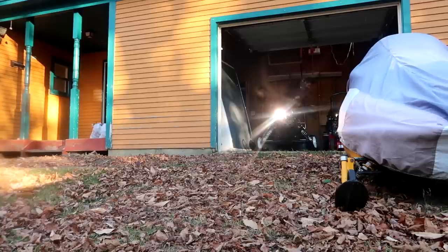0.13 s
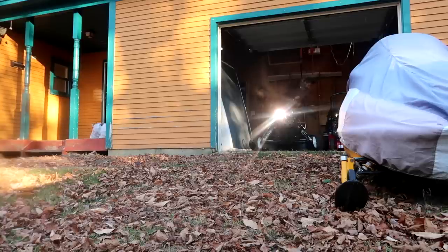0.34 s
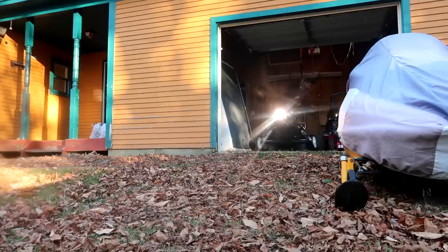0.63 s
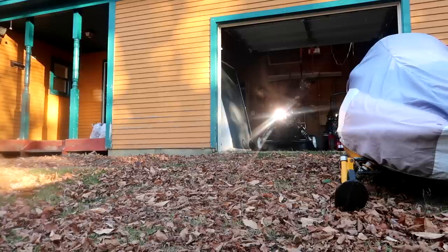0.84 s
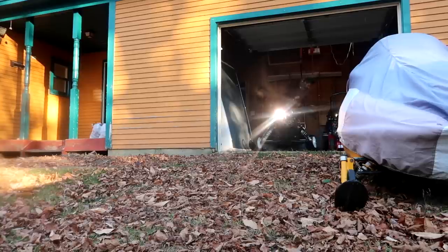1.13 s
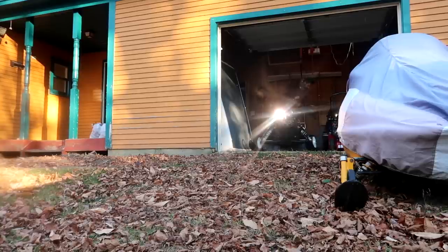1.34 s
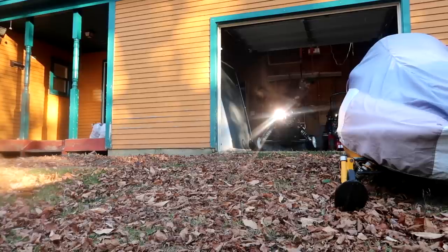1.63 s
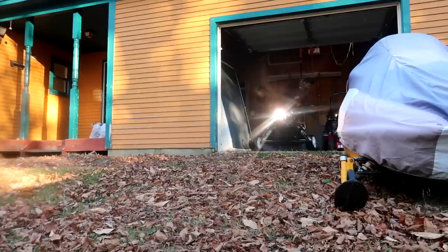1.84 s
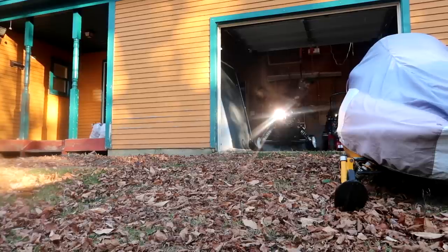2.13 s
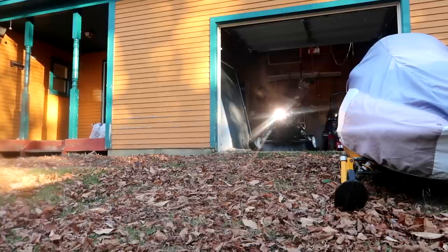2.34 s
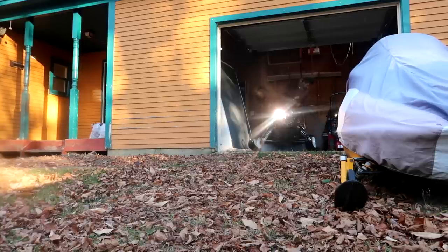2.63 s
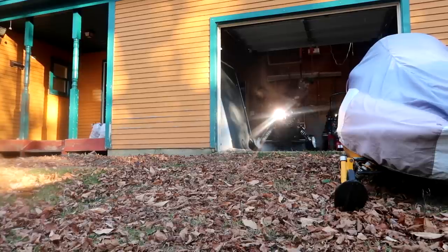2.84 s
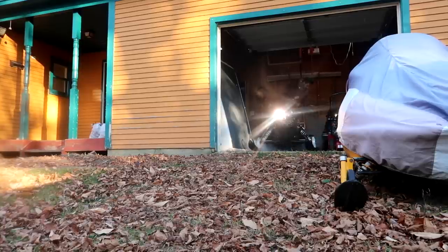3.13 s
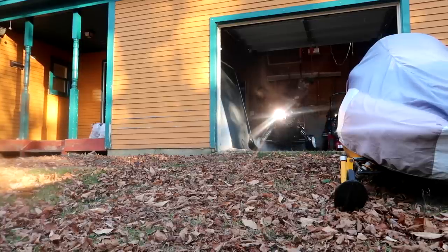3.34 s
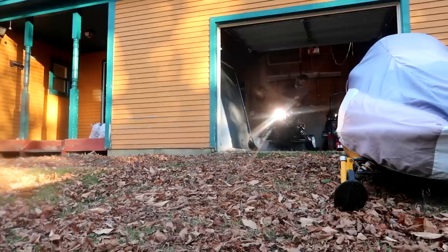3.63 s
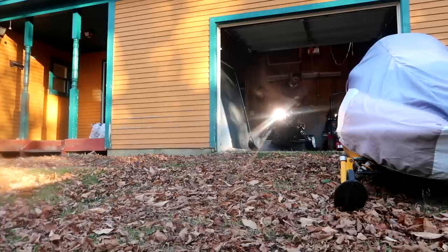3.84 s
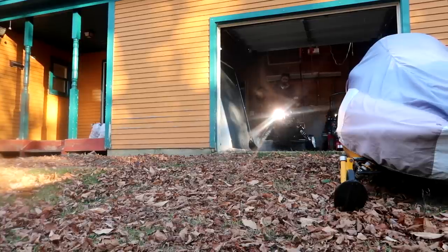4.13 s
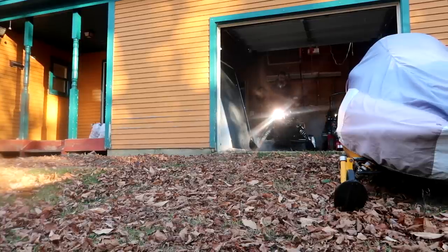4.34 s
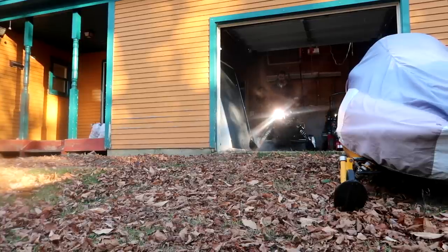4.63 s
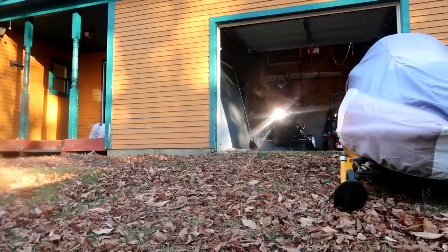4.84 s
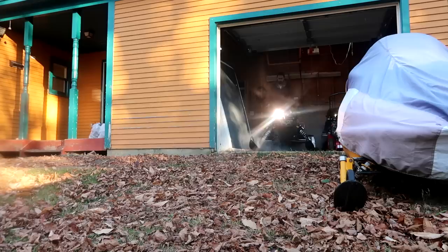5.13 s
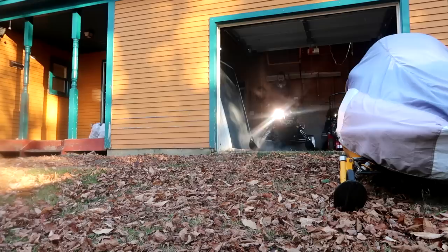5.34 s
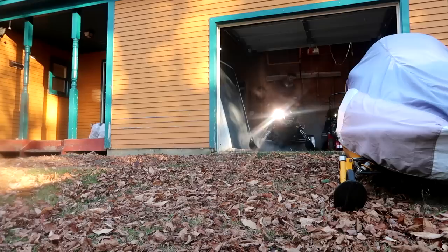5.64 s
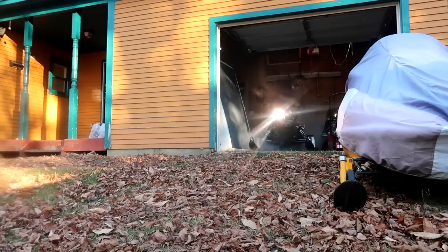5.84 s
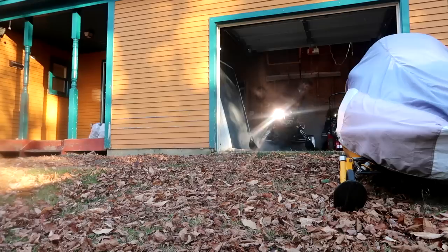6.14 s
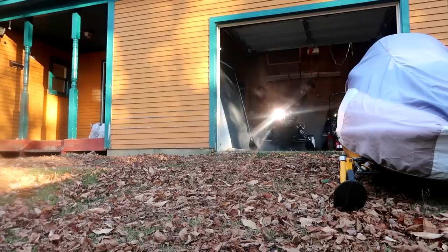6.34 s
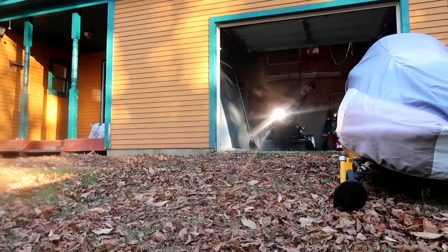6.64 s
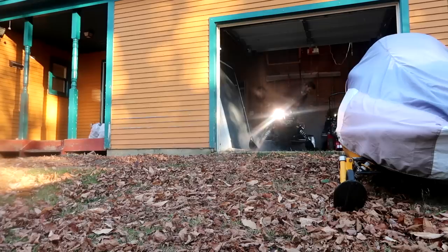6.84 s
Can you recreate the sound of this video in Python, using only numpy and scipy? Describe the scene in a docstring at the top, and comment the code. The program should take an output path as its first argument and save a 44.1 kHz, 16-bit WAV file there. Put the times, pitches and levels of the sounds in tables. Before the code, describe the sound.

A two-stroke snowmobile engine in an open garage, heard from the yard through a compact stereo microphone. From 0 to 2.3 s the throttle is blipped about six times, roughly every 0.3 to 0.5 s; each blip swells into a crackling, nasal howl, fastest near 0.9, 1.75 and 2.3 s, with hard, uneven pops ringing the pipe and garage. A bright knock lands at 0.9 s. The engine sags to a low idle around 2.7 s, gets two blips from 2.85 to 3.4 s, and sags again from 3.7 to 4.1 s. Four more quick blips follow from 4.15 to 5.2 s, the last peaking near 5.25 s. It then drops, and from 5.6 s to the end at 7 s it idles lumpily: misfiring pops, often paired, a hollow low boom swelling and fading, gated rattling hiss, metallic ticks and faint knocks.

```python
"""A string of throttle blips, then a lumpy idle: a two-stroke snowmobile in an open garage, heard from the yard.
Each firing is a sharp pop that rings the pipe and the garage; not every stroke fires.
Every stroke, fired or not, pumps a drone of harmonics; open throttle adds a howl of crisp pulses.
A boom swells at idle; noise gated by the strokes makes a rattling hiss, with ticks and a few engine knocks."""
import sys
import numpy as np
from scipy import signal
from scipy.fft import rfft, irfft
from scipy.io import wavfile
from scipy.ndimage import uniform_filter1d

SR = 44100
rng = np.random.default_rng(int(sys.argv[2]) if len(sys.argv) > 2 else 0)


def master(y):
    """Save y as 16-bit WAV."""
    cut = np.clip(np.atleast_2d(y).T, -1, 1)
    pcm = np.round(cut * 32767)  # scale
    wavfile.write(sys.argv[1], SR, pcm.astype(np.int16))


N = 307816
TIME, HZ = np.arange(N) / SR, np.fft.rfftfreq(N, 1 / SR)

# throttle blips: opens_s, closes_s, burn_db, intake_db (also drives the rasp); levels are relative
THROTTLE_BLIPS = [(-.1,0.226,-20,-37.5),(0.307,0.463,-17.5,-39.5),(0.632,0.844,-16.5,-39.5),(1.077,1.261,-14,-39),
                  (1.45,1.731,-14.5,-38),(1.95,2.275,-15.5,-38),(2.852,3.027,-15,-32),(3.185,3.391,-16,-35.5),
                  (4.152,4.263,-21,-33),(4.42,4.575,-15,-42),(4.689,4.865,-14,-40),(5.004,5.156,-14.5,-40.5)]
# the hardest firings: time_s, level_db (relative)
HARD_POPS = [(0.025,-0.5),(0.072,3.5),(0.115,-4),(0.1857,-0.5),(0.3021,2.5),(.334,-4),(0.3881,-0.5),(0.427,3),(0.4645,-3.5),(0.4829,-4),(0.577,-2.5),
             (0.659,-3),(0.69,2),(0.7213,1),(0.7616,5),(0.7909,-4.5),(0.8008,4),(0.8255,-8.5),(0.8346,1.5),(0.9181,1.5),(1.1095,-2.5),(1.174,-6),
             (1.2326,2),(1.2501,-1.5),(1.2852,-2),(1.3833,-1.5),(1.43,-2),(1.5149,-1.5),(1.594,1.5),(1.6125,-6.5),(1.631,2),(1.6642,-0.5),
             (1.7134,-3.5),(1.759,-1),(1.8254,-1.5),(1.9103,-2.5),(1.9856,-1),(2.0272,-0.5),(2.1064,2),(2.1254,1),(2.1592,3),(2.1829,-16.5),
             (2.2081,1.5),(2.2975,0),(2.3578,-1),(2.5242,-1),(2.627,-2.5),(2.69,-4.5),(2.808,-2),(2.82,1),(2.9229,-0.5),(2.96,-5),
             (2.97,-5),(3.0109,3),(3.0391,-2.5),(3.049,-1.5),(3.181,2.5),(3.2816,-1.5),(3.2918,3.5),(3.3225,0.5),(3.3722,3.5),(3.3999,-3),(3.411,-4),
             (3.5171,1),(3.5482,2),(3.6508,1),(3.6867,2),(3.832,0.5),(3.844,-2),(3.979,-2),(3.9918,-0.5),(4.141,-1),(4.1542,-7),
             (4.217,0),(4.272,0.5),(4.302,-1),(4.3116,1),(4.3579,1),(4.387,-6),(4.4544,3.5),(4.502,-2.5),(4.545,1.5),(4.563,-4.5),
             (4.5951,1.5),(4.6201,-12),(4.7141,-1.5),(4.7685,-2.5),(4.8044,-4.5),(4.821,-5),(4.837,-1.5),(4.8605,0.5),(4.869,-7),(4.878,-1.5),(4.9015,-8.5),(5.0307,-2.5),
             (5.0602,0),(5.1137,-2.5),(5.164,2),(5.2046,1),(5.358,-5),(5.432,-8),(5.518,-2.5),(5.58,-14.5),(5.675,-3.5),(5.688,-3.5),
             (5.835,-2),(5.849,-5),(5.975,-4.5),(6.016,-5),(6.111,-2),(6.179,-5.5),(6.248,-3.5),(6.384,-1),(6.398,-1.5),(6.546,-5),
             (6.59,-3),(6.739,-6.5),(6.753,-0.5),(6.901,-4.5),(6.942,-3.5)]


def crank():
    """The crank follows the blips; at idle it sags between hard firings and each kicks it back up."""
    # engine speed through blips, coasting and idle: time_s, strokes_per_s
    speed_curve = [(0.0, 107), (0.1, 97), (0.15, 100), (0.2, 91), (0.25, 97), (0.35, 91), (0.45, 108),
                   (0.5, 111), (0.55, 103), (0.6, 103), (0.65, 92), (0.75, 99), (0.85, 120), (0.9, 123),
                   (1.1, 90), (1.15, 93), (1.3, 120), (1.45, 93), (1.55, 99), (1.65, 120), (1.75, 130),
                   (1.85, 109), (2.0, 86), (2.05, 99), (2.15, 120), (2.3, 138), (2.35, 128), (2.45, 104),
                   (2.55, 90), (2.65, 85), (2.7, 76), (2.85, 75), (2.9, 78), (3.05, 112), (3.1, 102),
                   (3.25, 92), (3.35, 100), (3.4, 110), (3.55, 92), (3.65, 84), (3.7, 83), (3.78, 74),
                   (4.12, 74), (4.2, 79), (4.3, 105), (4.35, 109), (4.45, 101), (4.6, 126), (4.65, 122),
                   (4.7, 109), (4.75, 107), (4.85, 125), (4.9, 124), (5.05, 104), (5.2, 128), (5.25, 130),
                   (5.3, 116), (5.36, 101), (5.44, 86), (5.52, 81), (5.62, 74)]
    sag_rate = 68  # strokes per s lost each second at idle
    speed = np.interp(TIME, *np.transpose(speed_curve))
    pop_s = np.sort(np.transpose(HARD_POPS)[0])
    edges = np.r_[0, pop_s, TIME[-1]]
    gap = np.searchsorted(pop_s, TIME)
    middle_s = (edges[gap] + edges[gap + 1]) / 2
    idling = np.interp(speed, [76, 82], [1, 0])
    speed = uniform_filter1d(speed + sag_rate * (middle_s - TIME) * idling, size=900)
    strokes = np.cumsum(speed) / SR
    # a smoothed shift draws the whole strokes towards the hard firings
    slip = np.unwrap(np.interp(pop_s, TIME, strokes), period=1)
    return speed, strokes - uniform_filter1d(np.interp(TIME, pop_s, slip), size=3600)


def throttle(heights, delay_s, attack_s, release_s):
    """One envelope per blip: it rises once the lever opens, holds, and dies away after it closes."""
    out = np.zeros(N)
    for (opens_s, closes_s, *_), height in zip(THROTTLE_BLIPS, heights):
        rise = np.clip((TIME - opens_s - delay_s) / attack_s, 0, 1)
        release = np.exp(-np.maximum(TIME - closes_s - delay_s, 0) / release_s)
        out += height * rise * release
    return out


def stroke_times(strokes):
    """Moments in seconds at which the crank completes whole strokes."""
    return np.interp(np.arange(np.ceil(strokes[0]), strokes[-1] - 1), strokes, TIME)


def samples_at(time_s):
    """Sample positions of these moments."""
    return np.clip(np.round(time_s * SR).astype(int), 0, N - 1)


def firings(speed, strokes, load, burn_db=3, pop_db=0, crack_db=0.0, rasp_db=4, stray_db=-31,
            scatter_db=6, modes_db=-4.0, pop_ring_db=1, jitter_s=.00008, lag_s=0.0012):
    """Burning charges strike pipe and garage: most strokes on open throttle, mainly hard pops when shut."""
    # strokes that fail to fire: strokes_per_s, share
    misfires = [(95,.35),(115,.06)]
    # strength of the burn, then of its rasp: strokes_per_s, level_db
    burn_curve = [(75,-8.5),(92,-6),(108,-4),(130,-15.5)]
    rasp_curve = [(75,-33.5),(98,-21),(112,-24),(128,-13)]
    # how much of a firing is crack rather than thump: strokes_per_s, share
    crack_share = [(75,0.4),(95,0.43),(112,0.67)]
    # colour of thump, crack and rasp: pitch_hz, level_db
    thump_colour = [(30,-55.5),(75,-16),(130,9),(250,5),(450,17.5),(650,2),(1100,-15.5),(1700,-23),(2800,-34),(4500,-39.5),(9000,-70.5),(16000,-79)]
    crack_colour = [(60,-37.5),(200,-9.5),(450,13),(800,4),(1200,-3),(1800,-19),(3000,-32.5),(5000,-34.5),(9000,-55),(16000,-49.5)]
    rasp_colour = [(100,-30.5),(450,-14),(800,10.5),(1100,-5.5),(1500,-8),(2000,-15.5),(3200,-37),(5000,-50.5),(9000,-78.5),(16000,-82.5)]

    time_s = stroke_times(strokes)
    luck, bite, early = rng.standard_normal((len(time_s), 3)).T
    overrun = throttle(amp(np.transpose(THROTTLE_BLIPS)[3]), delay_s=0.035, attack_s=0.11, release_s=0.051)
    rate, fuel, heat = (np.interp(time_s, TIME, curve) for curve in (speed, load, overrun))
    uneven_db = scatter_db * np.interp(rate, [98, 122], [1, .6])  # fast running is cleaner
    burn = amp(burn_db) * fuel + amp(stray_db)
    burn = burn * amp(read(burn_curve, rate) + uneven_db * np.minimum(luck, 1))
    rasp = heat * amp(rasp_db + read(rasp_curve, rate) + uneven_db * np.minimum(bite, 1))
    fired = rng.random(len(time_s)) > read(misfires, rate)
    burn, rasp = burn * fired, rasp * fired

    # each hard pop takes the place of the nearest ordinary stroke
    time_s = time_s + jitter_s * early
    hard = np.zeros(len(time_s))
    for when_s, level_db in HARD_POPS:
        stroke = np.argmin(abs(time_s - when_s))
        time_s[stroke], burn[stroke], rasp[stroke] = when_s, 0, 0
        hard[stroke] = amp(level_db + pop_db)

    sharp = np.clip(read(crack_share, rate), 0, 1)
    at = samples_at(time_s + lag_s)  # the run down the pipe
    thumps, cracks, rasps, strikes = np.zeros((4, N))
    thumps[at] = (burn + hard) * (1 - sharp)
    cracks[at] = (burn + hard) * sharp * amp(crack_db)
    rasps[at] = rasp
    strikes[at] = burn + amp(pop_ring_db) * hard
    blows = garage(ring(thumps, pulse(thump_colour)) + ring(cracks, pulse(crack_colour)), wet_db=-5)
    ringing = amp(modes_db) * ring(strikes, resonances())
    return -(blows + ringing + garage(ring(rasps, pulse(rasp_colour)), wet_db=3.5))


def resonances():
    """Separate low modes of exhaust pipe and garage, each a decaying sine, in alternating polarity."""
    # ringing modes: pitch_hz, level_db, t60_s
    mode_table = [(87.3,-26.5,0.16),(137.66,-10,0.43),(229.8,-26.5,0.9),(279.2,-24.5,0.4),(365.2,-24.5,0.67),(424,-29,.25),(443.5,-14,0.12),(499.5,-23,0.4),(554,-42,0.022),(679.5,-33.5,0.89),(804,-39,0.025),(880,-37.5,0.35),(960,-32.5,0.41),(995,-25,0.33),(1161,-28,0.48)]
    t = np.arange(SR // 2) / SR
    out = np.zeros(len(t))
    for k, (hz, db, t60_s) in enumerate(mode_table):
        decay = np.exp(-np.log(1000) * t / t60_s)
        out += (-1) ** k * amp(db) * decay * np.sin(2 * np.pi * hz * t)
    return out


def howl(speed, strokes, load, level_db=10, scatter_db=1.4, wet_db=-7, lag_s=.0012):
    """On open throttle every stroke sends a crisp pulse down the pipe; at speed they merge into a note."""
    # colour of the exhaust pulse: pitch_hz, level_db
    howl_colour = [(40,-30),(110,-11),(175,-6),(235,9.5),(300,-4),(368,6),(430,0),(495,2),(580,-13),(760,-14),(1000,-7),(1400,-13),(2000,-28),(3200,-38),(6000,-62),(16000,-75)]
    time_s = stroke_times(strokes)
    steady = np.interp(speed, [86, 104, 118], [.3, .7, 1])  # fuller at speed
    scatter = amp(level_db + scatter_db * rng.standard_normal(len(time_s)))
    height = np.interp(time_s, TIME, steady * load) * scatter
    # the howl's pulse is softer under a hard pop
    height[[np.argmin(abs(time_s - when_s)) for when_s, _ in HARD_POPS]] *= .7
    beats = np.zeros(N)
    beats[samples_at(time_s + lag_s)] = height
    return -garage(ring(beats, pulse(howl_colour)), wet_db=wet_db)


def drone(speed, strokes, lumpy_db=2, waver_db=2.5):
    """Gas pumped on every stroke, fired or not, sounds harmonics; their level is lumpier above idle."""
    # strength of the drone: strokes_per_s, level_db
    hum_curve = [(70,-22),(80,-17.5),(88,-27.5),(100,-24.5),(112,-29),(130,-37.5)]
    # resonance of the pipe: pitch_hz, level_db
    pipe_colour = [(60,-18.5),(76,-7.5),(98,-14.5),(112,2.5),(128,-1.5),(146,-13.5),(165,-16.5),(190,-22),(222,5),(243,8.5),(265,1.5),(290,-6.5),(350,-21.5),(400,-2.5),(445,-5),(490,-4.5),(560,-25.5),(900,-37.5),(1500,-35.5)]
    unsteady = np.interp(speed, [76, 88], [.2, 1])
    level = amp(read(hum_curve, speed) + lumpy_db * unsteady * wander(16))
    return level * orders(speed, strokes, pipe_colour, waver_db)


def orders(speed, strokes, pipe, waver_db, count=12):
    """Multiples of the stroke rate, rms about 1: each swells as it crosses a resonance of the pipe."""
    tone, power = np.zeros((2, N))
    for k in range(1, count + 1):
        gain = amp(read(pipe, k * speed))
        phase = 2 * np.pi * (k * strokes + rng.random()) + .12 * wander(18)
        waver = amp(waver_db * (k > 2) * wander(6.9))  # the two lowest hold steady
        tone += gain * waver * np.cos(phase)
        power += gain ** 2 / 2
    return tone / np.sqrt(power)


def boom(speed, strokes, level_db=3, lag_s=0.003):
    """The pipe booms at twice the stroke rate: a tone with a drawn swell, faded out above idle."""
    # swells of the boom, in consecutive groups: time_s, level_db
    swell_groups = [
        [(2.66, -32), (2.684, -26), (2.716, -13.5), (2.752, -27), (2.81, -7.5), (2.85, -21), (2.882, -36),
         (2.906, -22), (2.946, -4), (3.0, -20)],
        [(3.6, -18), (3.718, -21), (3.74, -19), (3.842, -11), (3.882, -21.5), (3.974, -7.5), (4.024, -23.5),
         (4.136, -7.5), (4.21, -27.5), (4.25, -11)],
        [(5.52, -27), (5.552, -20.5), (5.608, -18), (5.68, -11), (5.738, -22.5), (5.802, -12), (6.056, -16),
         (6.082, -11), (6.232, -15), (6.3, -8.5)],
        [(6.3, -8.5), (6.386, -11.5), (6.43, -27.5), (6.526, -8), (6.576, -16), (6.75, -8.5), (6.79, -31.5),
         (6.874, -10.5), (6.958, -17), (6.98, -24)],
    ]
    idling = np.interp(speed, [79, 90], [1, 0])
    swell_db = np.interp(TIME, *np.vstack(swell_groups).T)
    return idling * amp(level_db + swell_db) * np.cos(4 * np.pi * (strokes - lag_s * speed))


def rattle(strokes, idle_db=-41.5, intake_db=-0.5, shake_db=-36, depth=0.16, fade_strokes=0.18,
           flutter_db=1.47):
    """Intake and machinery noise, gated by each stroke; throttle raises the intake, pops the machinery."""
    # overall colour of the hiss: pitch_hz, level_db
    hiss_colour = [(25,-0.5),(60,4.5),(100,23),(135,21),(250,17),(500,5),(1100,1.5),(1700,-2.5),(2400,-3),(3300,-12.5),(4600,-24),(6500,-27.5),(9200,-44.5),(11500,-35),(15500,-47)]
    # colour of the open intake against the machinery: pitch_hz, level_db
    intake_colour = [(70,-3),(140,-1),(400,1),(900,-1.5),(2200,-1.5),(4000,5.5),(8000,0.5)]
    # power shared by the two ports: pitch_hz, likeness
    port_likeness = [(1000,1),(2500,.97),(4500,.65),(8000,.4),(15000,.42)]

    power = amp(np.transpose(HARD_POPS)[1]) ** 2
    intake = throttle(amp(np.transpose(THROTTLE_BLIPS)[3] + intake_db),
                      delay_s=0.0092, attack_s=0.1, release_s=0.15)
    shake = amp(shake_db) ** 2 * jolts(rise_s=0.0011, fade_s=0.01, heights=power)
    level = np.sqrt(amp(idle_db) ** 2 + shake)
    gate = evened(1 - depth + depth * np.exp(-(strokes % 1) / fade_strokes))
    gate = gate * amp(flutter_db * wander(60))
    machinery, air = rng.standard_normal((2, 2, N)) * gate  # two ports each
    shared, other = rfft(level * machinery) + rfft(intake * air) * amp(read(intake_colour, HZ))
    same = np.clip(read(port_likeness, HZ), 0, 1) ** .5
    colour = amp(read(hiss_colour, HZ))
    ports = np.array([shared, same * shared + np.sqrt(1 - same ** 2) * other]) * colour
    treble = np.sqrt(np.mean(colour ** 2 * (HZ > 2200)))  # the level settings refer to the treble
    return irfft(ports, N) / treble


def jolts(rise_s, fade_s, heights):
    """A smoothed bump after every hard firing."""
    hits = np.zeros(N)
    hits[[round(when_s * SR) for when_s, _ in HARD_POPS]] = heights
    return lagged(lagged(hits * fade_s * SR, fade_s), rise_s)


def ticks(strokes, level_db=-31, scatter_db=5, wet_db=0):
    """Piston and clutch tick loosely about once a stroke, mostly faintly, now and then hard."""
    # colour of the tick: pitch_hz, level_db
    tick_colour = [(300,-33),(1500,-5),(2400,-1.5),(3500,-3),(4800,-15),(7000,-27.5),(9200,-37.5),(11500,-26.5),(16000,-35)]
    whole = np.arange(np.ceil(strokes[0]), strokes[-1] - 1)
    play, size = rng.standard_normal((len(whole), 2)).T
    at = (np.interp(whole + .5 + .2 * play, strokes, TIME) * SR).astype(int)
    hits = np.zeros(N)
    hits[at] = amp(level_db + scatter_db * np.minimum(size, 2))
    return garage(ring(hits, pulse(tick_colour)), wet_db=wet_db)


def knocks(ring_s=0.0093, level_db=-6):
    """The engine knocks as a charge fires: a brief bright noise burst that the garage repeats."""
    # knocks, mostly just ahead of the pop in the exhaust: time_s, level_db (relative)
    knock_list = [(0.9157,-15),(5.967,-28),(6.009,-21),(6.173,-23),(6.339,-32),(6.584,-19),(6.773,-31),(6.938,-21)]
    # colour of a knock: pitch_hz, level_db
    knock_colour = [(200,-34.5),(1200,7.5),(2800,5),(4500,-9.5),(7000,-38),(14000,-39.5)]
    burst = np.zeros(N)
    for when_s, db in knock_list:
        burst += amp(db) * np.exp(-abs(TIME - when_s) / ring_s) * (TIME >= when_s)
    noise = evened(irfft(rfft(rng.standard_normal(N)) * amp(read(knock_colour, HZ)), N))
    return amp(level_db) * garage(burst * noise, wet_db=-8.5)


def garage(x, wet_db, low_hz=480, gap_s=0.007):
    """Direct sound plus scattered reflections above the separate low modes, decaying by frequency."""
    # garage decay: pitch_hz, t60_s
    decay_table = [(400,0.059),(1200,0.64),(4000,0.26),(12000,0.059)]
    size = SR // 2
    taps = rng.choice([-1., 1.], size) * (rng.random(size) < .09) * (np.arange(size) > gap_s * SR)
    hz, t, bands = signal.stft(taps, SR, nperseg=256)
    decay = amp(-60 * t / read(decay_table, hz)[:, None])
    tail = signal.istft(bands * decay, SR, nperseg=256)[1]
    low_cut = signal.butter(4, low_hz, "high", fs=SR, output="sos")
    tail = signal.sosfilt(low_cut, tail / np.linalg.norm(tail))
    return x + amp(wet_db) * ring(x, tail)


def pulse(spectrum, size=4096):
    """The sharpest causal (minimum-phase) pulse with this spectrum, peak 1."""
    log_gain = np.log(amp(read(spectrum, abs(np.fft.fftfreq(size, 1 / SR)))))
    shape = np.fft.ifft(np.exp(np.conj(signal.hilbert(log_gain)))).real[:size // 2]
    return shape / abs(shape).max()


def ring(x, response):
    """Passes x through an impulse response."""
    return signal.oaconvolve(x, response)[:N]


def lagged(x, lag_s):
    """Follows x with a time constant."""
    keep = np.exp(-1 / (lag_s * SR))
    return signal.lfilter([1 - keep], [1, -keep], x)


def wander(rate_hz):
    """Slow random drift of rms 1, with nothing at or above rate_hz."""
    return evened(irfft(rfft(rng.standard_normal(N)) * (HZ < rate_hz), N))


def read(points, x):
    """Reads a table on a logarithmic axis of frequency or speed."""
    axis, value = np.transpose(points)
    return np.interp(np.log(x + 1), np.log(axis + 1), value)


def evened(x):
    """Scales to rms 1."""
    return x / np.sqrt(np.mean(x ** 2) + 1e-20)


def amp(db):
    """Decibels to gain."""
    return 10 ** (np.asarray(db) / 20)


def scene():
    """One throttle and one crank drive the engine's layers; a few engine knocks are added on top."""
    speed, strokes = crank()
    load = throttle(amp(np.transpose(THROTTLE_BLIPS)[2]), delay_s=0.014, attack_s=0.085, release_s=0.067)
    exhaust = firings(speed, strokes, load) + howl(speed, strokes, load)
    tones = drone(speed, strokes) + boom(speed, strokes)
    return exhaust + tones + rattle(strokes) + ticks(strokes) + knocks()


def record(dry):
    """Two close ports differ in phase and level; peaks are squeezed, then the top is cut."""
    # phase of left against right: pitch_hz, lead_radians
    phase_lead = [(0,0),(130,0),(350,-.05),(1000,-.1),(2000,-.13),(3000,-.3),(4000,-1.05),(8000,-1.3),(15000,-1)]
    # level of left over right: pitch_hz, level_db
    level_tilt = [(125,0),(500,-.6),(2000,-1.2),(4000,-1.9),(8000,-.2)]
    port = np.exp(.5j * read(phase_lead, HZ)) * amp(read(level_tilt, HZ) / 2)
    heard = irfft(rfft(dry) * np.array([port, 1 / port]), N)
    squeezed = heard / (1 + heard ** 10) ** (1 / 10)  # overload on the loudest peaks
    top_cut = signal.firwin(511, 15700, window=("kaiser", 9), fs=SR)  # edge in Hz
    return signal.oaconvolve(squeezed, top_cut[None], "same")


dry = scene()
out = record(dry)
master(out)
```